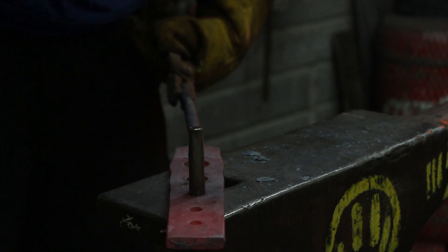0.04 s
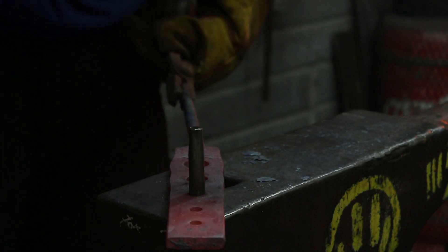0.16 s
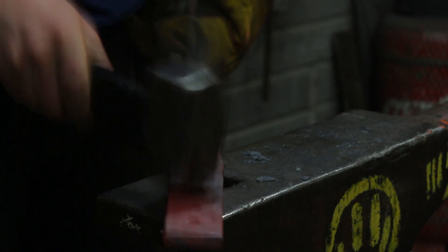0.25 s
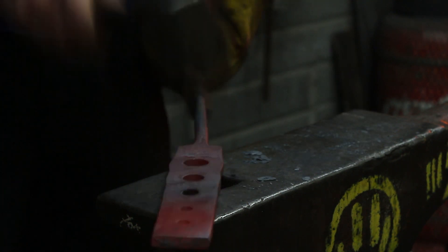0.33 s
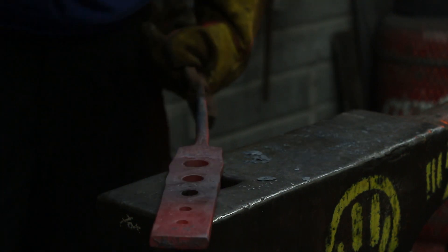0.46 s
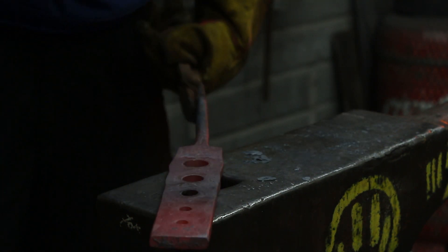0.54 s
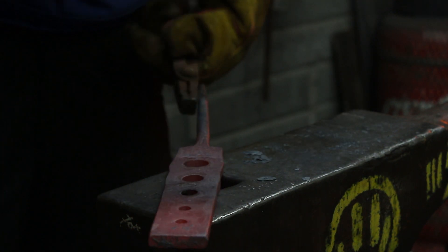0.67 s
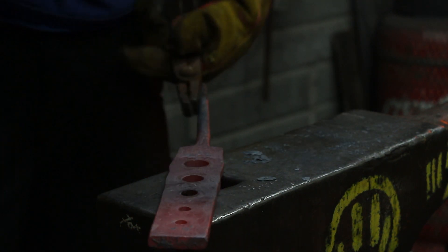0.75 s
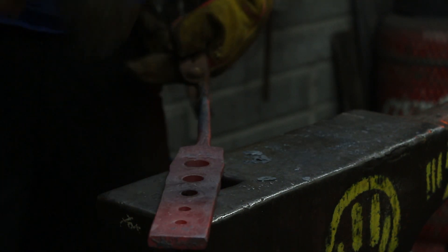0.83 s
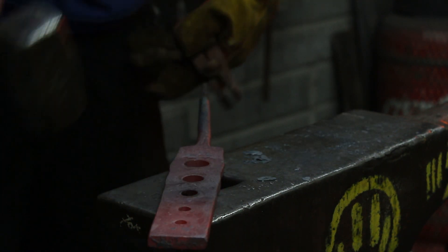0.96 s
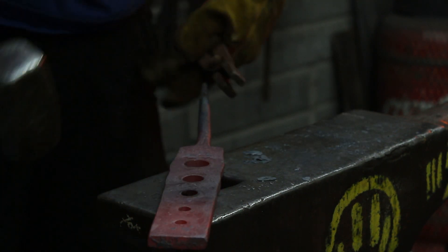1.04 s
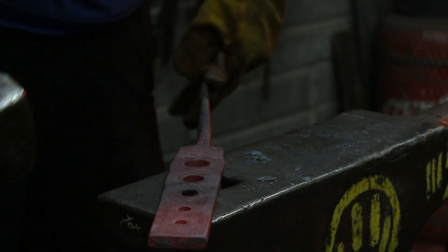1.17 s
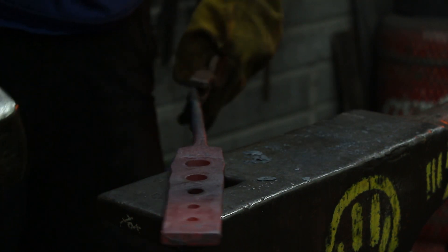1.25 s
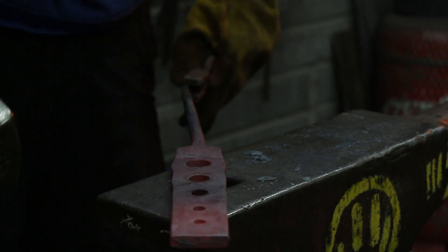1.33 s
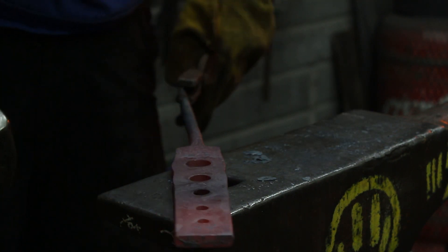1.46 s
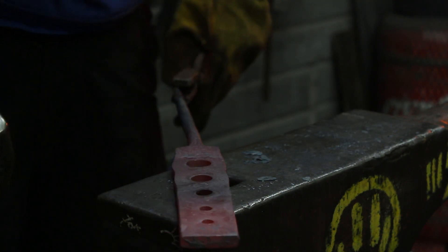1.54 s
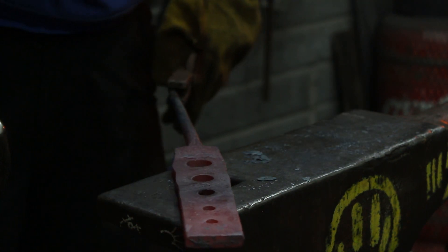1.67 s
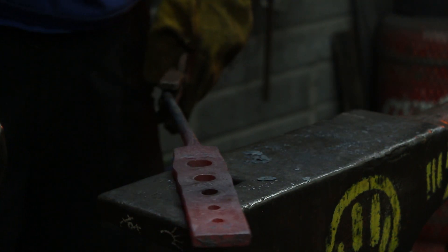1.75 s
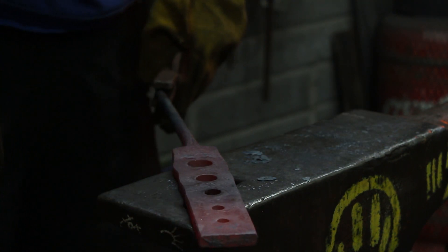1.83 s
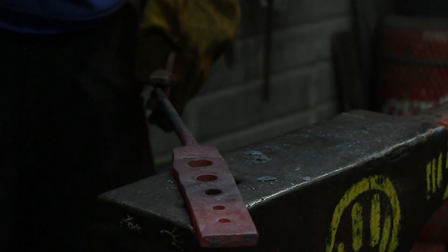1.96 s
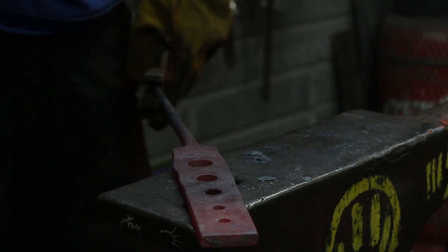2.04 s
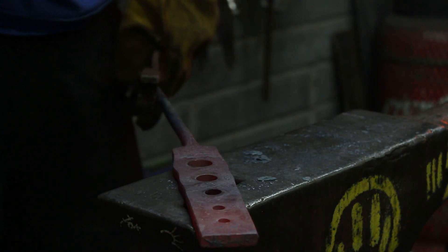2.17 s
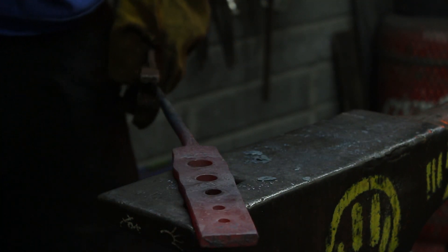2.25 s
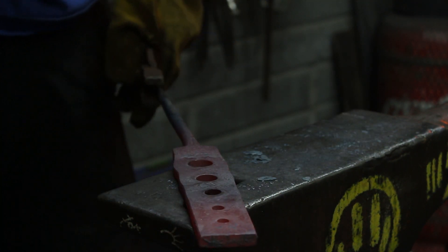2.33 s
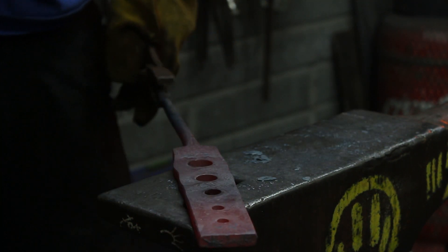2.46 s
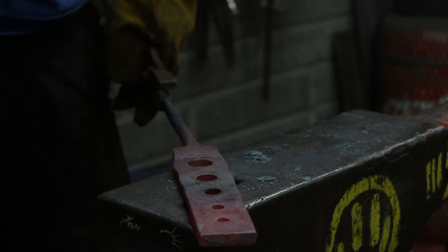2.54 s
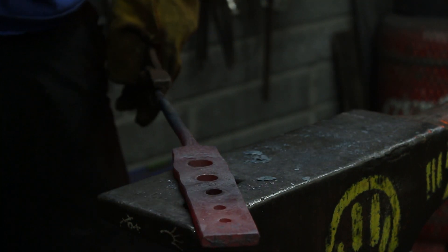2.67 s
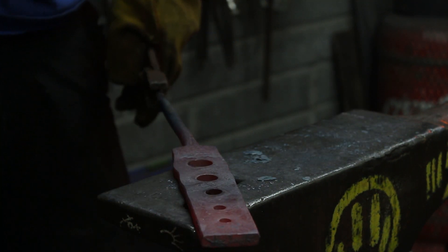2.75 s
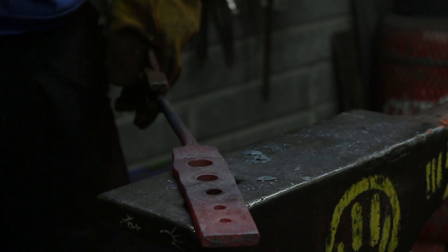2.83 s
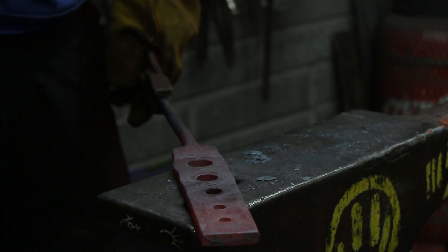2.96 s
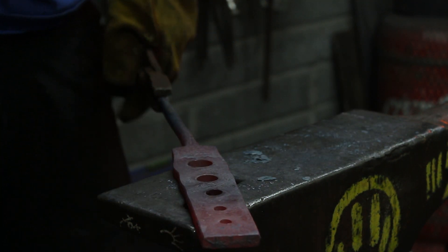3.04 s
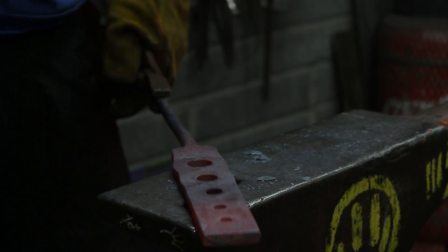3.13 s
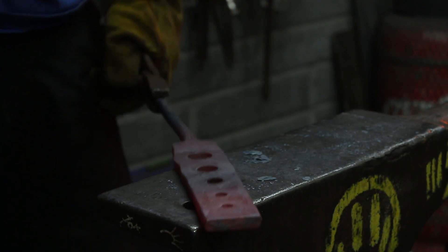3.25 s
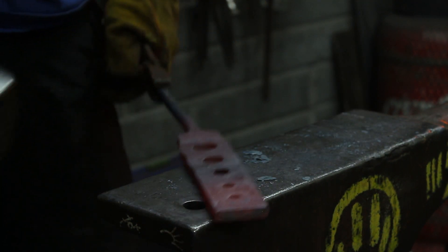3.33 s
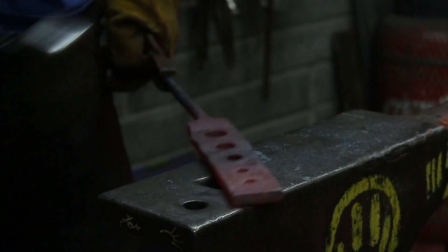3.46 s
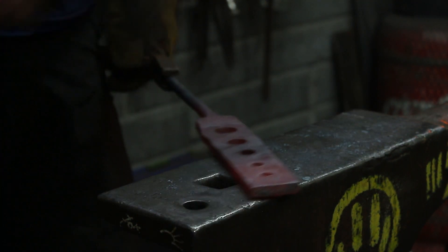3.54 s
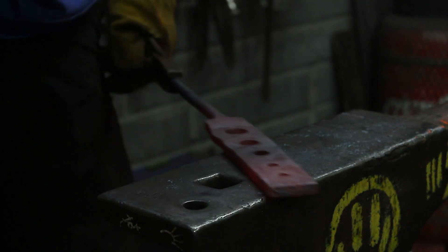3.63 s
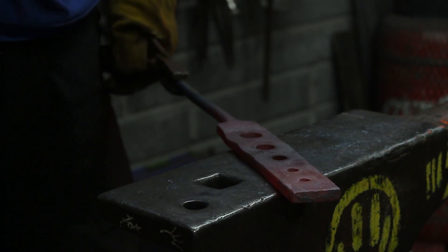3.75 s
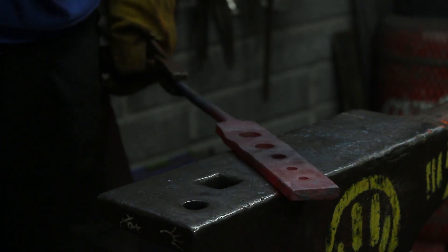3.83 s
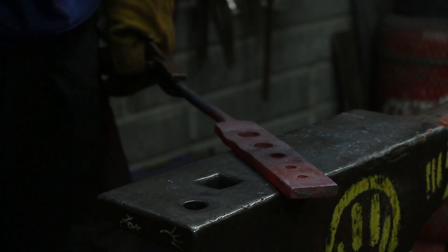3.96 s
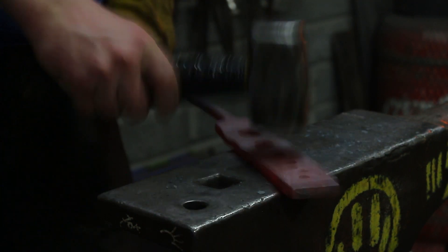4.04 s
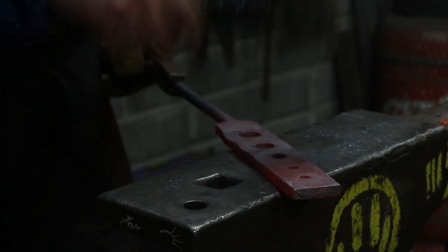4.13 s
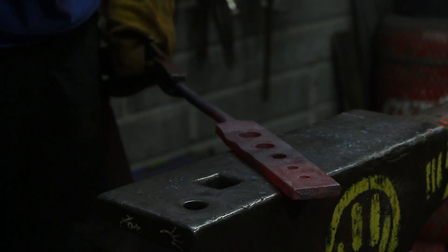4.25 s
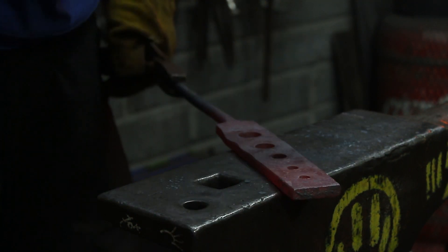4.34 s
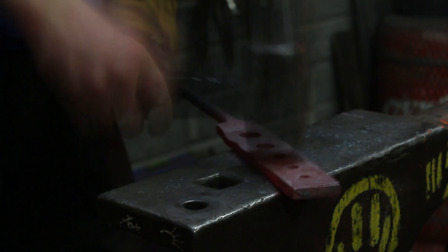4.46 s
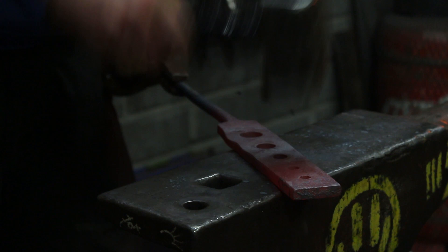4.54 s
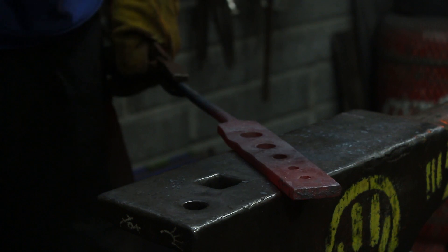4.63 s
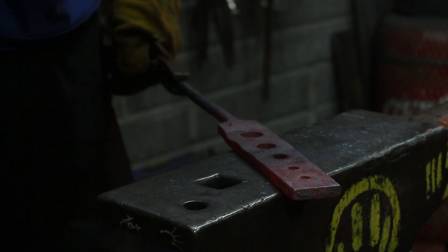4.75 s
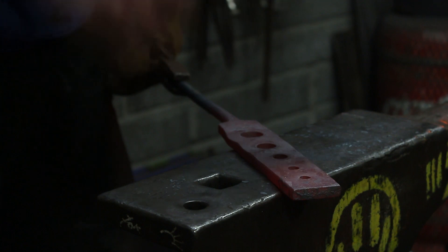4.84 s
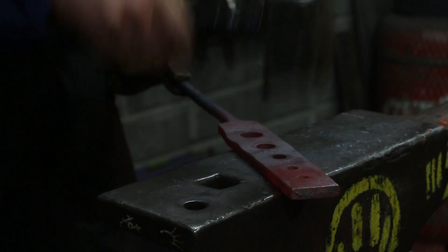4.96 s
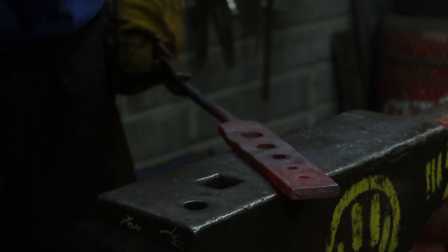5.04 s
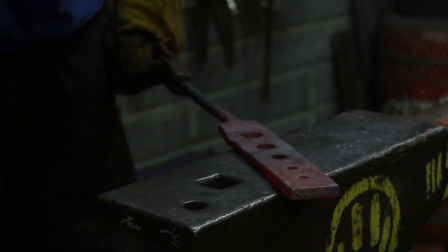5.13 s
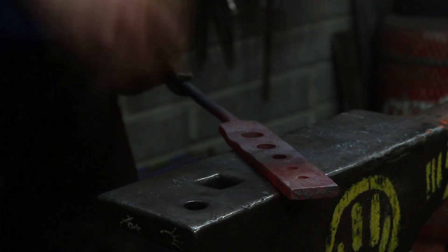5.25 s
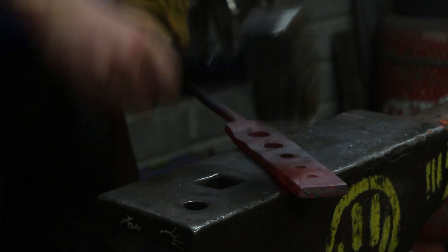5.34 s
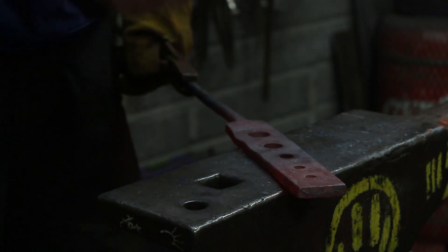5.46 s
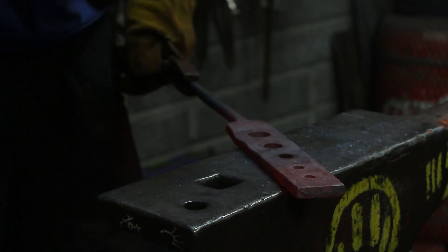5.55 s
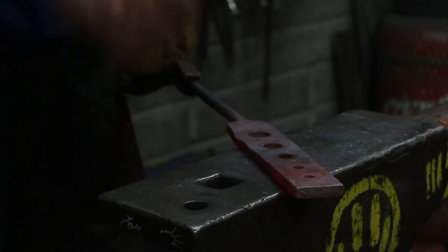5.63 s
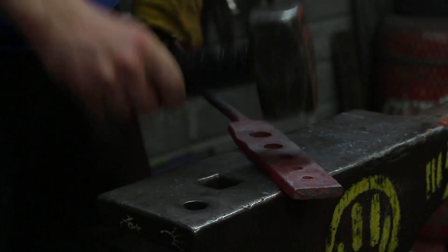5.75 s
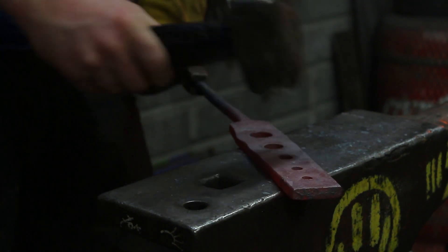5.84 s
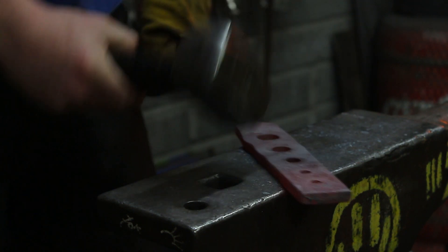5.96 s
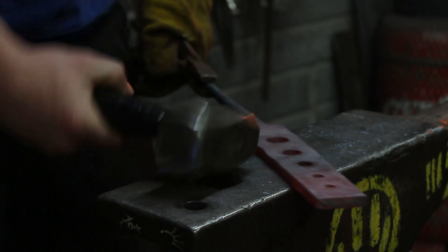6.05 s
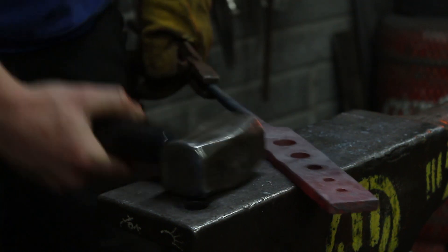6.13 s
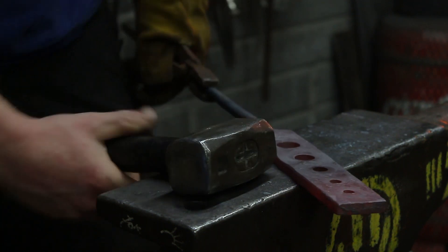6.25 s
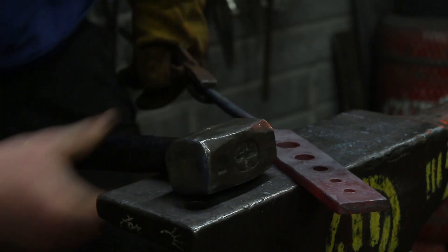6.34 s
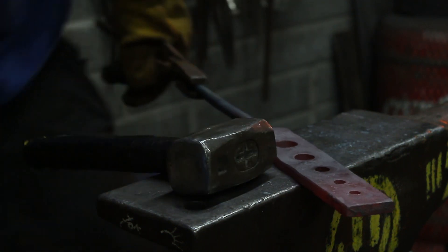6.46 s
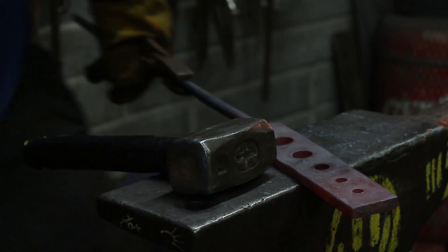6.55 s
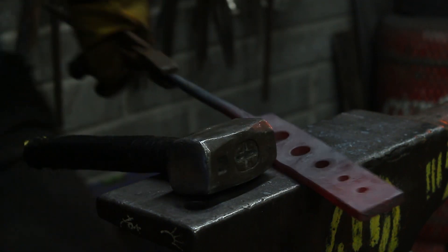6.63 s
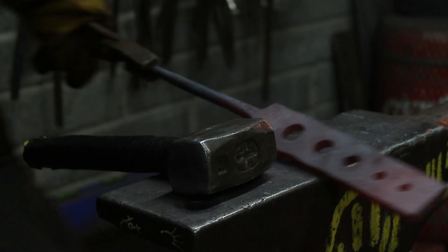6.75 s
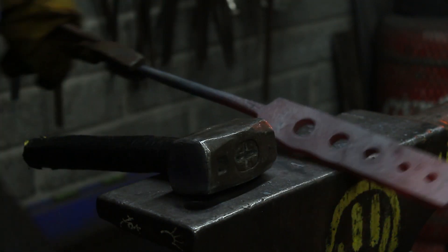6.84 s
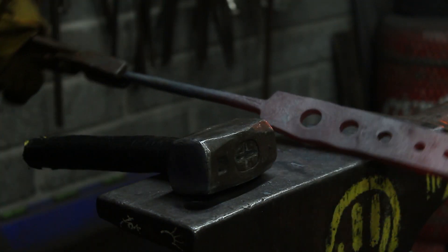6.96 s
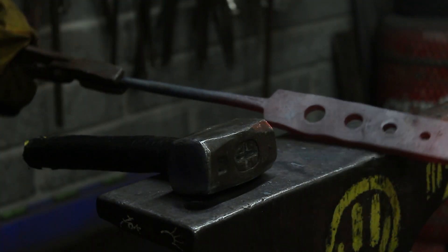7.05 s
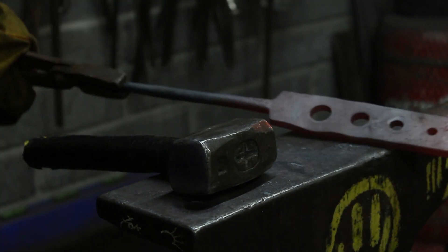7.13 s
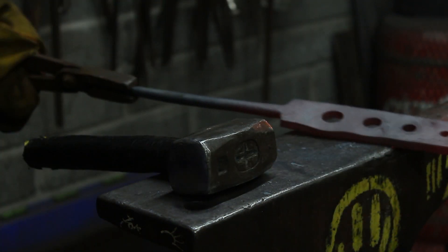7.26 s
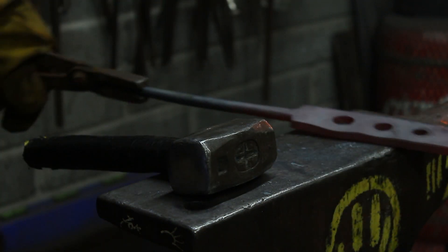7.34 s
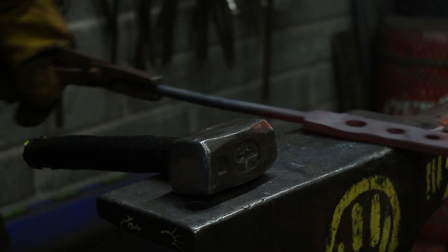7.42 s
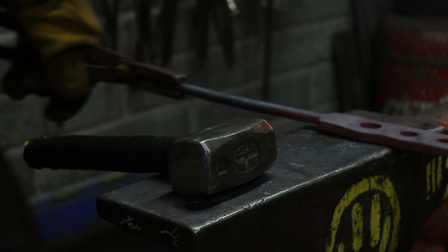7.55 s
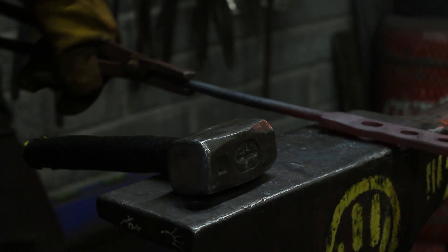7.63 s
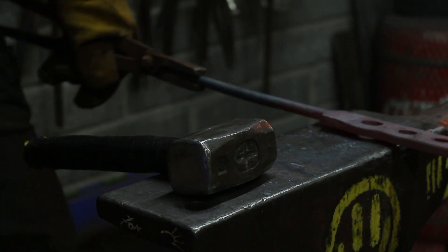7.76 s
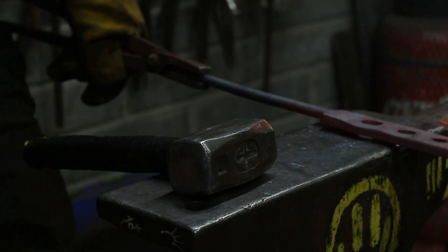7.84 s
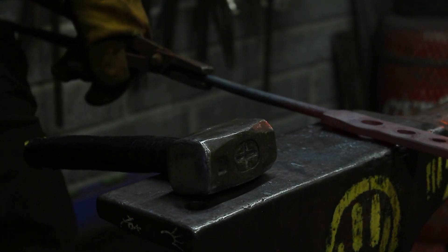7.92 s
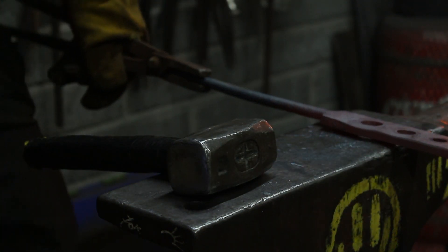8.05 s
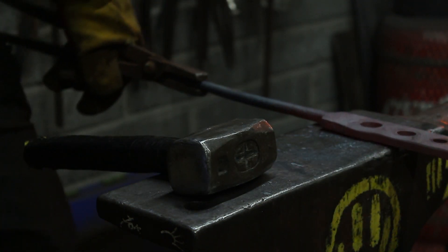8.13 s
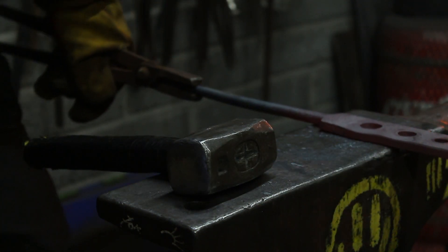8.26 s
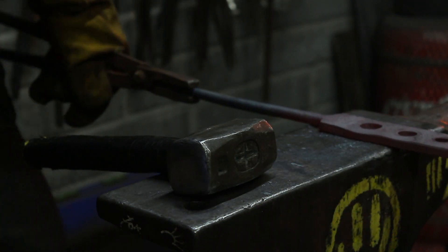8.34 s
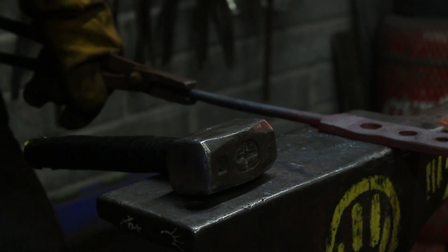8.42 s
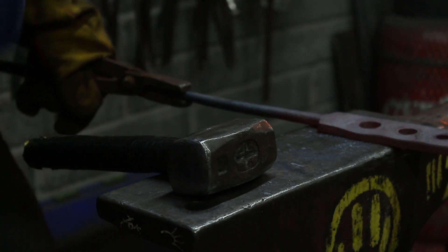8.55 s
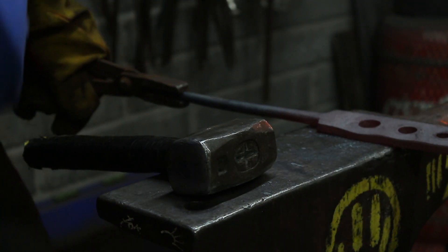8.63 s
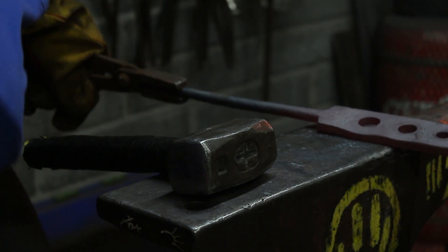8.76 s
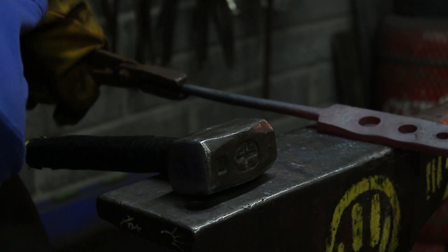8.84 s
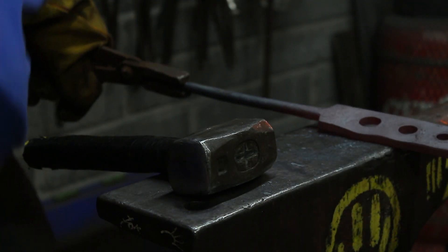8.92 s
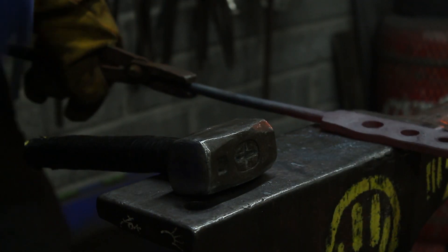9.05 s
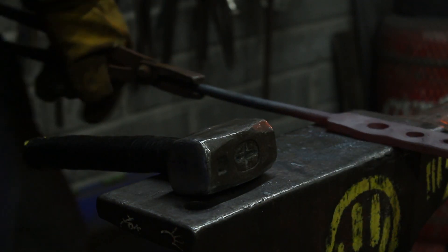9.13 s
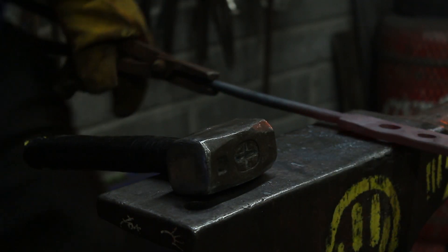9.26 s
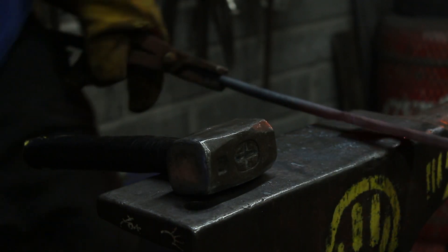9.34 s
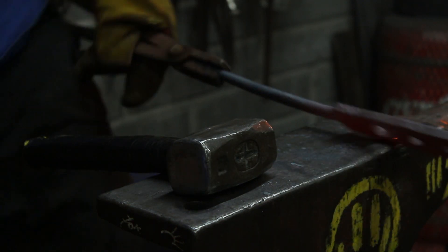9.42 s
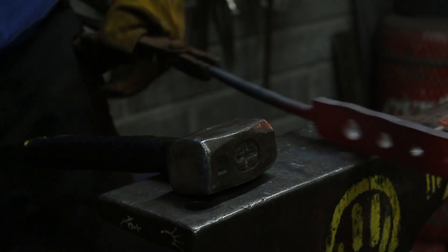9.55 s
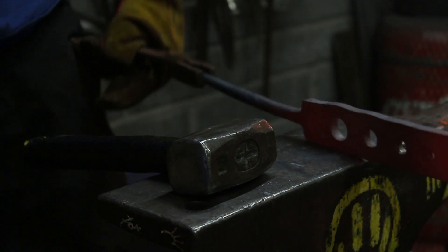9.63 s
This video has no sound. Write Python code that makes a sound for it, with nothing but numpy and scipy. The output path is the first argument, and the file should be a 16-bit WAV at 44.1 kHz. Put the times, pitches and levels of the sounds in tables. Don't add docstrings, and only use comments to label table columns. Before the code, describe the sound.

A gas forge roars steadily in the background, low, hollow and soft, in a small brick smithy with short reflections. The fading ring of an earlier blow opens the scene. At about 0.35 seconds a hammer clanks hard on a steel drift, close and overloaded; from 0.6 to 0.85 the drift clatters and bounces among loose tools. Tiny scale flakes tick between 1.3 and 3.1, and a dull slide brushes past near 3.5. Five loud, bright anvil blows land at about 4.1, 4.6, 5.0, 5.4 and 5.8, each cracking and ringing briefly. From 6.1 to 6.35 the hammer is laid down in quick solid knocks, rocking to rest. Soft rubs, a short bright scrape and faint ticks follow around 7 to 7.9. At 8.1 a drift drops with a sharp ping, rebounding in a high ringing rattle until 8.6. Quiet sliding and a small scrape close near 9.5.

```python
import sys
import numpy as np
from scipy import signal
from scipy.fft import rfft, irfft
from scipy.io import wavfile
from scipy.ndimage import uniform_filter1d

SR = 44100
rng = np.random.default_rng(int(sys.argv[2]) if len(sys.argv) > 2 else 0)


def inscribe(sig):
    pcm = np.round(np.clip(np.atleast_2d(sig).T, -1, 1) * 32767)
    wavfile.write(sys.argv[1], SR, pcm.astype(np.int16))


def rack_gain(trim_db):
    fader = np.asarray(trim_db, float)
    return 10 ** (fader / 20)


N = 427329

# (frequency [Hz], level [dB])
FLAME_ROAR = [(20, -65.5), (50, -60.5), (120, -46), (380, -30), (600, -31.5), (1200, -41.5), (1850, -45.5),
              (2600, -53.5), (4000, -54), (7500, -54), (10000, -56), (16000, -57)]
# (frequency [Hz], width [Hz], level [dB])
FORGE_RESONANCES = [(83.38, 29, -24.5), (146.85, 18, -20.5), (172, 9.6, -30), (207.7, 24.4, -7),
                    (232.4, 20.6, -10), (272, 24.6, -1), (297.84, 29.1, -3), (325, 15, -5.5),
                    (424.84, 45, -14), (462.9, 48, -17.5), (524.4, 40, -17.5), (628.6, 25, -25.5),
                    (715.6, 88, -26.5), (782.7, 28, -24), (859, 30, -47), (940, 40, -33), (1004, 38, -33.5),
                    (1094.6, 28, -29), (1381, 45, -37), (2084, 64, -38.5), (2388.3, 160, -37.5),
                    (3070, 1500, -46.5), (5240, 13, -38), (5817, 43, -41.5), (6790, 140, -45.5),
                    (8967, 1300, -47.5), (10900, 79, -48), (15400, 80, -53)]
# (frequency [Hz], t60 [s])
ROOM_DECAY = [(60, 0.46), (300, 0.13), (1100, 0.184), (3000, 0.224), (7000, 0.221), (11000, 0.2106),
              (16000, 0.11)]
# (frequency [Hz], share [0-1])
LEFT_RIGHT_LIKENESS = [(60, 0.39), (130, 0.42), (290, 0.972), (640, 0.9116), (1410, 0.85), (3100, 0.72),
                       (6820, 0.076), (15000, 0.14)]
# (loudest time [s], length [s], level [dB], centre [Hz])
SCUFFS_HEARD = [
    (3.445, .36, -51.5, 5438),
    (3.6, .25, -56.5, 12110),
    (7.0, 1, -52.5, 4870),
    (7.3, .2, -46, 10790),
    (7.552, .3, -60, 3009),
    (7.903, 0.29, -56, 4510),
    (9.2, .8, -57, 5080),
    (9.548, 0.27, -49.5, 7080),
]
# (frequency [Hz], level [dB])
CRACK_COLOUR = [(24, -37.5), (40, -4.5), (1220, -9), (2160, -8), (2910, -13), (3550, -12.5), (4790, -11.5),
                (5160, -8), (5850, -9.5), (15500, -19.5)]

# (time [s], force [dB], crack tilt [dB per octave])
SCALE_TICKS = [(1.280, -47.5, 2), (1.333, -55.5, -8), (1.52, -56.5, -0.5), (2.035, -50, -1),
               (2.627, -50.5, 3), (3.075, -40, 15.5), (6.87, -51, -6.5), (7.537, -41.5, -6),
               (7.56, -42.5, -10), (7.614, -46.5, 0), (7.755, -56, 0)]
# (time [s], force [dB], bending ring [dB], end-on ring [dB])
DRIFT_KNOCKS = [(.337, -21, -5.5, 5), (.580, -11.5, 9, 2), (8.115, -19.5, 6.5, 4.5), (8.121, -8.5, 3, 8.5),
                (8.140, -26, 12, 18), (8.198, -40.5, 17, 17.5), (8.334, -34.5, 18, -6),
                (8.404, -34.5, 17, 5.5), (8.418, -35.5, 24, 2), (8.433, -37, 23.5, 3.5),
                (8.478, -42, 16, 0), (8.53, -52, 11, 2.5), (8.575, -54, -9.5, -4)]
# (time [s], force [dB], bending ring [dB], end-on ring [dB], clatter
# [dB])
DRIFT_TUMBLES = [
    (.586, -13.5, 1.5, 8, 9),
    (.607, -21.5, -9.5, 8.5, 2),
    (.627, -23, 6, 11.5, 3.5),
    (.694, -31, 3.5, 5.5, -7),
    (.730, -22, -4, -18.5, 2),
    (.782, -44, 12, 8, -5),
    (.84, -46, 17, 4.5, -0.5),
]
# (time [s], force [dB], face [dB], cheek [dB], peen [dB])
HAMMER_CONTACTS = [
    (6.139, -3, -13, -1.5, -9),
    (6.191, -1, 9.5, 2.5, -4.5),
    (6.232, -8.5, -15, 6.5, -7),
    (6.247, -5.5, 1.5, 6, 1),
    (6.283, -10, -8.5, 7, -13),
    (6.325, -16, -11.5, 8.5, -16),
    (6.341, -22.5, -15, 8, -13.5),
]
# (time [s], force [dB], main modes [dB], low modes [dB], upper modes [dB])
HAMMER_BLOWS = [
    (-.075, -0.5, -20, -3.5, -18.5),
    (.337, -1.5, -7, 3, -10.5),
    (0.356, 5.5, -0.5, 4, 5.5),
    (4.123, 4.5, -8.5, -12, 5.5),
    (4.570, 5.5, -4, -5.5, -14.5),
    (4.983, 6, -4, -3.5, -7),
    (5.394, 5.5, -3.5, -4.5, -5),
    (5.797, 5, 0, -14.5, 6),
]

LOW_HZ, MIDDLE_HZ, MAIN_HZ, UPPER_HZ, TOP_HZ = 2885, 4047, 5123, 6218, 7002
BEND_HZ, TWIN_HZ = 5456, 5550
# (frequency [Hz], level [dB], t60 [s], left-right [dB])
SCALE_MODES = [
    [(6722, -1.5, 0.049, 0), (8893, -1, 0.056, 0)],
]
# (frequency [Hz], level [dB], t60 [s], left-right [dB])
DRIFT_MODES = [
    [(7252, -24.5, 0.16, 0.0054), (10330, -28.5, .1, 0), (12000, -26, .12, 0.0051)],
    [(BEND_HZ, -6.5, 0.41, 0.975), (TWIN_HZ, -7.5, 0.456, 0.994)],
    [(12680, -10, .3, -1), (12740, -4, .3, -1), (12800, -3, .36, -1), (12862, -7, .3, -1)],
    [(1000, -11, 0.14, 0.0011), (2164, -6, 0.11, 0.0033), (2375, -8.5, .17, 0.0031),
     (2555, -12, .12, 0.0021), (3050, -12.5, .12, 0.0027), (3350, -6.5, .12, 0.0081),
     (3605, -3, 0.15, 0.0048), (3652, -5, .16, 0.0065), (4180, -19, 0.15, 0)],
]
# (frequency [Hz], level [dB], t60 [s], left-right [dB])
HAMMER_MODES = [
    [(4250, -16, .08, 0), (TOP_HZ, -26, .12, 0), (MAIN_HZ, -16, .15, -6), (3500, -16, .035, 0),
     (80, -28, .3, 0)],
    [(LOW_HZ, -7, .2, -7), (2922, -13, .14, -5), (8700, -28, .06, 0), (4400, -23, .1, 0)],
    [(1780, -9, .025, 0), (1935, -7, .075, 0), (1995, -7, .075, 0), (2200, -13, .03, 0)],
    [(UPPER_HZ, -14, .33, 3), (9631, -29, .1, 0), (13130, -24, .17, -4)],
]
# (frequency [Hz], level [dB], t60 [s], left-right [dB])
ANVIL_MODES = [
    [(83, -23.5, 0.28, -3.5), (115, -21, 0.2864, 2), (489.5, -13, 0.1526, -6.5), (783, -23.5, 0.1455, -3),
     (1240.5, -19.5, 0.1638, -9), (1385.5, -19, 0.0408, -7.5), (1672.5, -19, 0.0794, 1),
     (MIDDLE_HZ, -10.5, .23, 4), (4093, -22.5, 0.2366, -5), (4290, -19, 0.1428, -2),
     (5372, -36, 0.2773, -3.5), (TOP_HZ, -16.5, 0.23, -4), (9197.5, -29, 0.2752, -3),
     (10169.5, -24.5, 0.001, -2.5), (12999, -31.5, 0.1154, 0)],
    [(MAIN_HZ, -3.5, 0.4795, -12)],
    [(1942.5, -20.5, 0.16, 1.5), (2078, -12.5, 0.1943, -1), (LOW_HZ, -8, .22, 0.987),
     (2922, -18.5, 0.18, 0.5)],
    [(UPPER_HZ, -17, 0.32, 4)],
]

LEAD = SR // 4
ONSET = 48


def evened(x):
    return x / np.sqrt(np.mean(x ** 2) + 1e-20)


def read(points, hz):
    f, value = np.transpose(points)
    return np.interp(np.log(hz + 1), np.log(f + 1), value)


def add(mix, s, sound):
    part = mix[:, LEAD + round(s * SR):][:, :sound.shape[-1]]
    part += sound[..., :part.shape[1]]


def pair(shape, same):
    a, b, c, d = rng.standard_normal(shape[::-1] + (4,)).T
    same = np.clip(same, 0, 1)[:, None]
    left = a + 1j * b
    right = same * left + np.sqrt(1 - same ** 2) * (c + 1j * d)
    return np.array([left, right])


def forge():
    frames, hz = N // 1024 + 5, np.fft.rfftfreq(4096, 1 / SR)
    power = rack_gain(2 * read(FLAME_ROAR, hz))
    for f, width_hz, db in FORGE_RESONANCES:
        power = power + rack_gain(2 * db) / (1 + (2 * (hz - f) / width_hz) ** 2) ** 2
    slow = uniform_filter1d(rng.standard_normal((frames, 2049)), 4, 0)
    patches = evened(uniform_filter1d(slow, 50, 1)).T
    z = pair((2049, frames), read(LEFT_RIGHT_LIKENESS, hz))
    z = z * np.sqrt(power)[:, None] * rack_gain(0.41 * patches)
    roar = signal.istft(z, nperseg=4096, noverlap=3072)[1][:, :N]
    return rack_gain(-24) * evened(roar)


def smithy(x):
    hz, t = np.fft.rfftfreq(128, 1 / SR), np.arange(700) * 32 / SR
    decay = rack_gain(-60 * t / read(ROOM_DECAY, hz)[:, None])
    z = pair((65, 700), read(LEFT_RIGHT_LIKENESS, hz)) * decay
    tail = signal.istft(z, nperseg=128, noverlap=96)[1]
    tail = tail * np.clip(np.arange(tail.shape[1]) / SR / 0.00077, 0, 1)
    return signal.fftconvolve(x, tail / np.linalg.norm(tail[0]), axes=1)[:, :x.shape[1]]


def scuff(s, length, db, centre_hz):
    frames, hz = round(length * SR / 64), np.fft.rfftfreq(256, 1 / SR)
    octaves = np.log2((hz[:, None] + 50) / centre_hz)
    grain_db = 3.0 * evened(uniform_filter1d(rng.standard_normal(1024), 5))
    z = pair((129, 1024), 0.63 + 0 * hz) * rack_gain(-7 * octaves ** 2 + grain_db)
    sound = evened(signal.istft(z[..., :frames], nperseg=256, noverlap=192)[1])
    stroke_db = -14 * np.linspace(-1, 1, sound.shape[1]) ** 2
    return s - length / 2, sound * rack_gain(db + stroke_db)


def crack(tilt_db, length, low_hz):
    t, hz = (np.arange(2048) - ONSET) / SR, np.fft.rfftfreq(2048, 1 / SR)
    tilt = tilt_db * np.log2(np.maximum(hz, 2500) / 3000)
    colour = rack_gain(read(CRACK_COLOUR, hz) + tilt) * hz ** 2 / (hz ** 2 + low_hz ** 2)
    burst = rng.standard_normal(2048) * np.exp(-t / length) * (t >= 0)
    waves = rfft(burst)
    even = waves / np.sqrt(abs(waves) + 1e-9)
    smooth = irfft(even * colour) * signal.windows.tukey(2048, ONSET / 1024)
    return smooth[:-512] * np.linalg.norm(burst) / np.linalg.norm(smooth)


def ring(modes, t, turn_db, turn_hz, rise_s):
    out = np.zeros((2, len(t)))
    coarse = t[::128]
    for hz, db, t60, pan_db in modes:
        rates = turn_hz * rng.uniform(0.2, 1.6, (2, 2, 1))
        phases = rng.random((2, 2, 1))
        swing_db = turn_db * np.sin(2 * np.pi * (rates * coarse + phases)).sum(0)
        level = rack_gain(swing_db + np.array([[.5], [-.5]]) * pan_db + db - 60 * coarse / t60)
        level = np.array([np.interp(t, coarse, side) for side in level])
        path = rng.uniform(-1, 1) * np.array([[1], [-1]]) * 1.8e-5
        out += level * np.sin(2 * np.pi * hz * (t + path))
    return out * np.sin(np.pi / 2 * np.minimum(t / rise_s, 1)) ** 2


def strikes(rows, body, length, low_hz, echo_db, choke_db, turn_db, turn_hz, rise_s):
    cracks, rings = np.zeros((2, N + LEAD)), np.zeros((2, N + LEAD))
    t = np.arange(SR * 2 // 3) / SR
    times = np.array([row[0] for row in rows])
    for s, force_db, tilt_db, *groups_db in rows:
        add(cracks, s - ONSET / SR, rack_gain(force_db) * crack(tilt_db, length, low_hz))
        later = uniform_filter1d(1. * np.searchsorted(times[times > s] - s, t), size=300)
        for modes, db in zip(body, [0, *groups_db]):
            heard = t < 1.5 * max(mode[2] for mode in modes)
            level = rack_gain(force_db + db + choke_db * later[heard])
            add(rings, s, level * ring(modes, t[heard], turn_db, turn_hz, rise_s))
    return np.array([cracks + rings, rack_gain(echo_db) * cracks + rack_gain(-16) * rings])


def scale_ticks():
    return strikes(SCALE_TICKS, SCALE_MODES, 0.009, low_hz=1180, echo_db=7.0, choke_db=-3,
                   turn_db=0.18, turn_hz=9, rise_s=.0012)


def drift_drops():
    clean_db = -30
    rows = sorted(DRIFT_TUMBLES + [(*row, clean_db) for row in DRIFT_KNOCKS])
    drops = []
    for s, db, bend_db, end_db, clatter_db in rows:
        tilt_db = min(-3 + .7 * end_db, 4.5)
        drops.append((s, db, tilt_db, bend_db, end_db, clatter_db))
    return strikes(drops, DRIFT_MODES, 0.0023, low_hz=885, echo_db=6, choke_db=-4.5,
                   turn_db=6.0, turn_hz=14, rise_s=.004)


def hammer_laid_down():
    rows = [(s, db, -9.5 + .3 * groups[0], *groups) for s, db, *groups in HAMMER_CONTACTS]
    return strikes(rows, HAMMER_MODES, 0.00081, low_hz=1020, echo_db=-0.5, choke_db=0,
                   turn_db=2.5, turn_hz=17, rise_s=.001)


def hammer_blows():
    tilt_db = 1.19
    rows = [(s, db, tilt_db, *groups) for s, db, *groups in HAMMER_BLOWS]
    return strikes(rows, ANVIL_MODES, 0.00501, low_hz=130, echo_db=2.5, choke_db=-11,
                   turn_db=1.61, turn_hz=8.21, rise_s=.014)


def scene():
    direct, feed = scale_ticks() + drift_drops() + hammer_laid_down() + hammer_blows()
    steel = direct + smithy(feed)
    for row in SCUFFS_HEARD:
        add(steel, *scuff(*row))
    balance_db = -0.23
    return (steel[:, LEAD:] + forge()) * rack_gain(np.array([[.5], [-.5]]) * balance_db)


def top_cut(x):
    return signal.sosfilt(signal.butter(12, 15610, fs=SR, output="sos"), x)


def record(dry):
    overloaded = np.clip(dry, -1, 1)
    return top_cut(overloaded)


dry = scene()
out = record(dry)
inscribe(out)
```